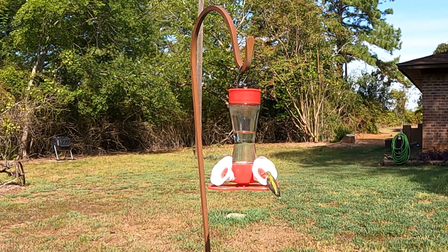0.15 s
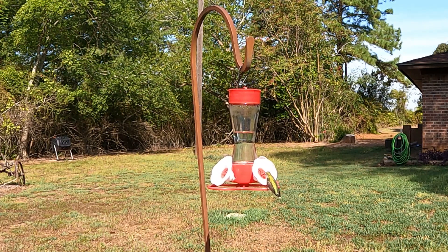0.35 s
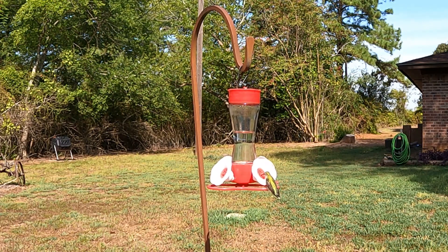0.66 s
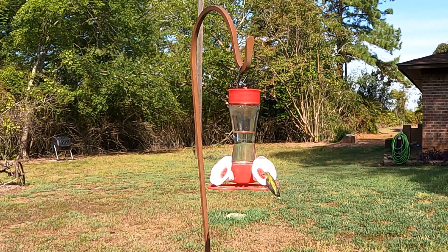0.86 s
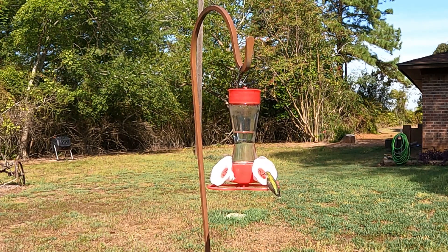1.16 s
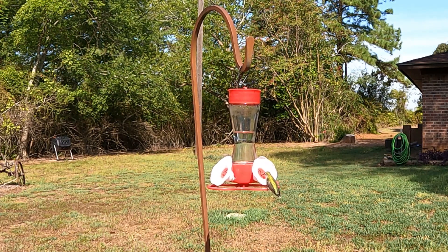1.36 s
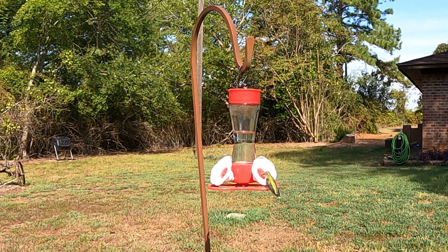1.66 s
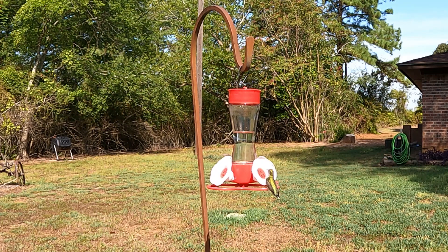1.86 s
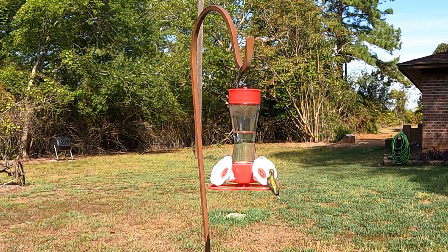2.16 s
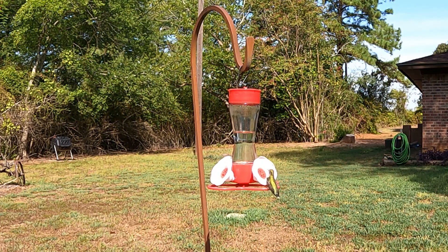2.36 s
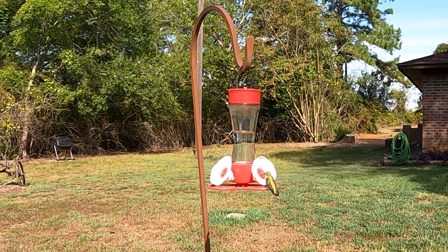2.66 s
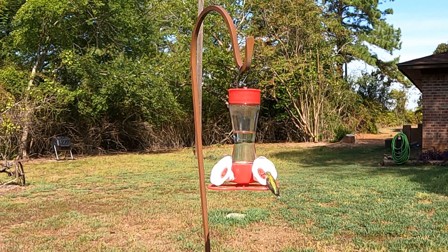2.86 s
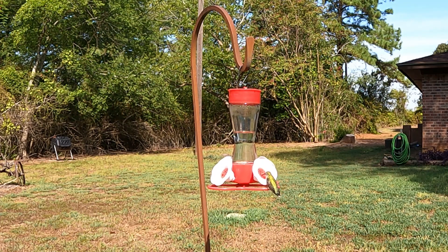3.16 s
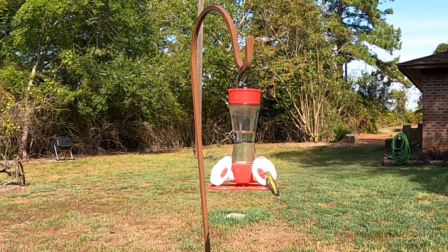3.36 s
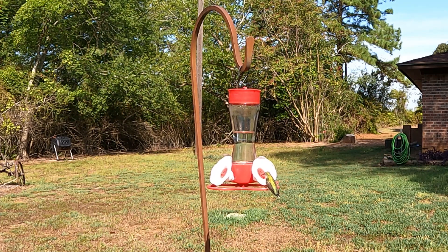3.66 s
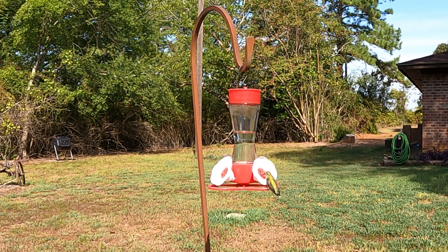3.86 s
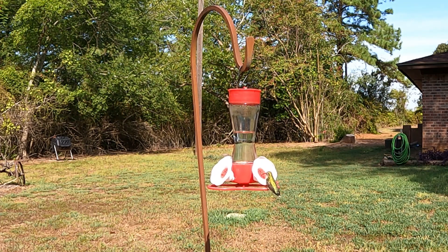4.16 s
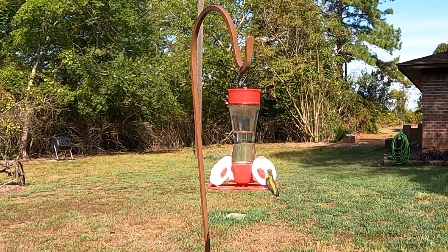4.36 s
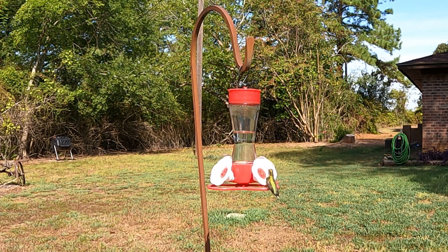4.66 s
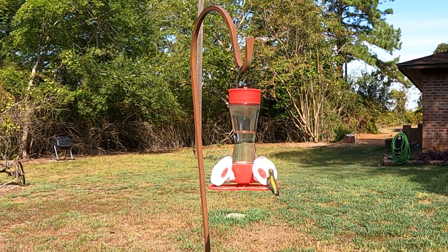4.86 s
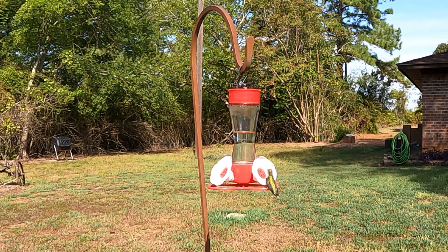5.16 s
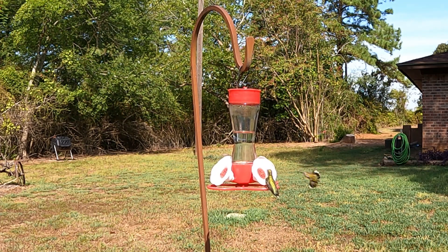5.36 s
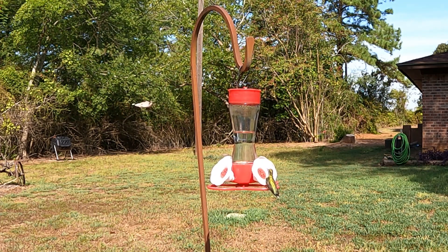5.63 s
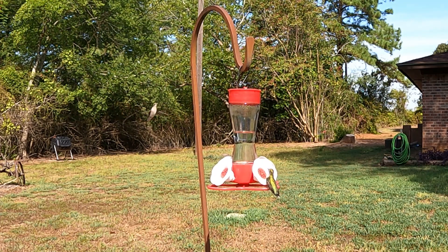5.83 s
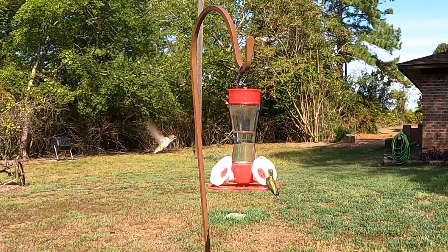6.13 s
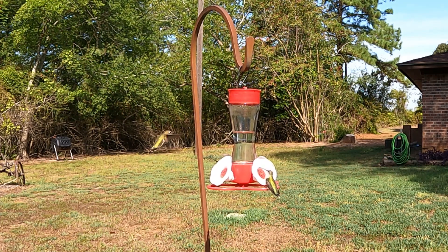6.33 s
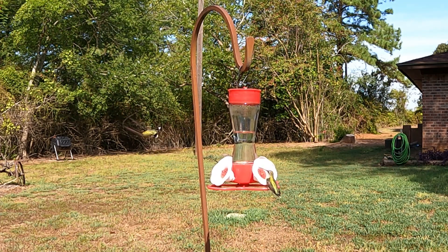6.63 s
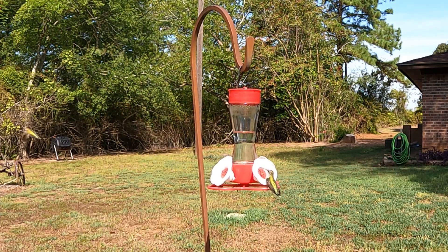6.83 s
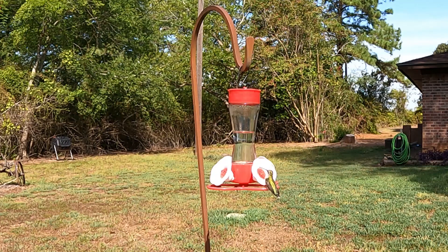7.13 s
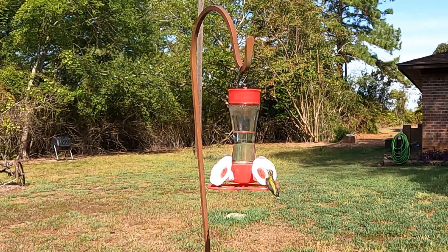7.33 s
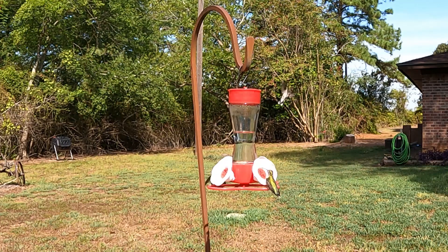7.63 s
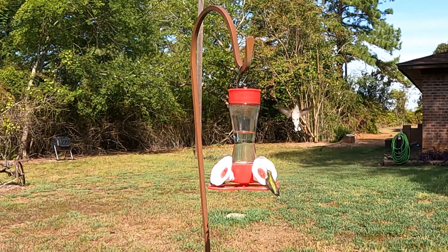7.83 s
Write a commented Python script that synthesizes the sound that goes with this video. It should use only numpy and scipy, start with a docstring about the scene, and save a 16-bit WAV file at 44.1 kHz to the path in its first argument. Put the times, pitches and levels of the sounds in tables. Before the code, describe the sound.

High songbird chirps and hummingbird chitter over low wind rumble and far traffic, followed by the darting hum of a hummingbird's wings.

```python
"""A back yard by a hummingbird feeder. Over a wash of far traffic and leaves, eddies of a breeze buffet
the microphone and a katydid buzzes by stridulation. A small songbird's syrinx gives rising chirps and
thin whistles, hummingbirds chitter in steep harmonic sweeps, and a jay and faint high voices call from
the trees. One hummingbird whirrs up to the feeder and hovers, each wingbeat a pulse of air.
The tree line scatters the calls back as diffuse echoes."""
import sys
import numpy as np
from scipy import signal
from scipy.fft import rfft, irfft, next_fast_len
from scipy.io import wavfile
from scipy.ndimage import uniform_filter1d

SR = 44100
rng = np.random.default_rng(int(sys.argv[2]) if len(sys.argv) > 2 else 0)


def persist_wave(psi):
    """Save psi, clipped to +-1, as 16-bit WAV."""
    counts = np.round(np.clip(psi, -1, 1) * 32767).astype(np.int16)
    wavfile.write(sys.argv[1], SR, np.atleast_2d(counts).T)


N = 352359
T = np.arange(N) / SR

# spectrum of the background: (frequency [Hz], gain [dB])
YARD_SPECTRUM = [(30, -8), (55, -0.5), (68, 6), (130, -10), (210, -11.5), (350, -23), (800, -26.5),
                 (1150, -21.5), (2200, -36.5), (3700, -41), (4700, -38), (6200, -40), (7700, -33),
                 (8600, -37), (15000, -68.5)]
# spectrum of eddies at the microphone: (frequency [Hz], gain [dB])
WIND_SPECTRUM = [(8, -12), (25, 0.5), (50, -2), (80, -5.5), (120, -19), (200, -28), (400, -60),
                 (1000, -68.5)]
# strength of the breeze: (time [s], level [dB])
BREEZE = [(0, -57.5), (1.05, -43), (2.0, -65.5), (2.9, -43.5), (3.8, -42), (5.1, -46.5), (6.05, -44.5),
          (6.65, -52), (7.2, -35), (7.55, -46), (7.9, -36)]
# strong eddies: (time [s], duration [s], level [dB], upper band edge [Hz])
BUFFETS = [(0.895, .058, -33.5, 50), (4.413, .063, -29.5, 77.5), (4.513, .05, -34.5, 78),
           (5.123, .05, -37, 69), (6.842, .065, -29, 61.3), (7.156, .058, -27, 80), (7.18, .045, -32, 256),
           (7.216, .14, -32.5, 97.4), (7.253, 0.0197, -40.5, 296)]
# rising chirps: (time [s], duration [s], start pitch [Hz], level [dB], upper sideband gain [dB])
CHIRPS = [(0.31, .068, 6240, -39.5, -3), (0.404, 0.067, 6330, -38.5, -6), (1.493, 0.077, 6170, -43.5, -1.5),
          (1.577, 0.061, 6080, -37, -4.5), (1.704, .071, 6190, -35.5, -6.5), (3.069, 0.069, 6460, -46, -9),
          (3.188, 0.077, 6450, -42, -13), (3.948, 0.075, 6600, -45.5, -7), (4.058, .059, 6470, -39.5, -13),
          (5.161, .06, 6330, -39.5, -16), (5.273, 0.053, 6570, -40, -22), (6.513, .065, 6100, -49, -3.5),
          (6.616, .05, 6100, -45, -6.5)]
# falling whistles: (time [s], duration [s], start pitch [Hz], end pitch [Hz], level [dB],
# trill depth [Hz], left minus right [dB])
WHISTLES = [(0.469, 0.054, 7140, 6880, -44, 10, 0), (0.655, 0.086, 6930, 6190, -56.5, 650, -1),
            (2.236, 0.077, 6910, 6530, -52, 63, -4), (2.634, 0.059, 6520, 6505, -51, 29, -3),
            (2.737, 0.075, 6400, 5880, -55, 490, -2)]
# hummingbird chips: (time [s], length [strokes], level before filtering [dB])
CHIPS = [(.818, 3.3, -61.5), (.937, 1.7, -63), (1.025, 1.85, -64), (1.124, 2, -65.5), (1.279, 1.9, -69),
         (2.905, 3.6, -59), (3.058, 1.65, -61.5), (3.164, 1.8, -63)]
# harmonics 1 to 4 of a stroke, before rasp darkens them: (gain [dB])
CHIP_HARMONICS_DB = [-3, -2, -1, -8]
# filter that colours the chips: (frequency [Hz], gain [dB])
CHIP_FILTER = [(1500, 6), (3000, -8), (3800, 0.5), (4600, -3), (6000, -2), (7800, 8), (9000, -8),
               (12000, -26)]
# jay cries: (time [s], duration [s], level [dB], gain of the fundamental [dB])
JAY_CRIES = [(1.408, .33, -64, -6.5), (3.756, .34, -60.5, -9), (7.06, .34, -58, -17.5)]
# faint calls from the trees: (time [s], duration [s], start pitch [Hz], level [dB])
FAR_CALLS = [(2.164, 0.16, 7960, -66.5), (2.847, .18, 8260, -66), (4.979, 0.24, 8150, -67),
             (5.127, 0.087, 3310, -71), (5.385, 0.083, 3280, -70), (6.199, 0.24, 7930, -68),
             (7.168, 0.23, 8150, -66.5), (7.878, .11, 8270, -70)]
# wingbeat in flight: (time [s], beat rate [Hz])
WINGBEAT = [(5.45, 52.05), (5.9, 51.75), (6.04, 46.68), (6.22, 52.8), (6.4, 42.55), (6.58, 43.84),
            (6.67, 54.76), (6.82, 44.9), (7.1, 46.2)]
# darts and sharp turns: (time [s], duration [s], effort [0-1])
DARTS = [(5.482, 0.17, 0.73), (5.672, 0.072, 0.56), (5.999, 0.2, 0.53), (6.206, 0.072, 1.0),
         (6.653, 0.096, 0.73)]
# spectrum of one wing pulse: (frequency [Hz], gain [dB])
WING_SPECTRUM = [(40, -36), (100, -2.5), (160, 1), (205, 2), (260, -4), (370, -8.5), (530, -13), (630, -28),
                 (1200, -49.5)]
# spectrum of feather hiss: (frequency [Hz], gain [dB])
SWISH_SPECTRUM = [(250, 10), (600, -3), (1300, 6), (2600, -1.5), (4000, -6), (5500, -4), (8000, -11),
                  (12000, -23)]


def undb(db):
    """Amplitude ratio of a level in decibels."""
    return 10 ** (np.asarray(db) / 20)


def unit(x):
    """Normalisation to rms 1."""
    return x / np.sqrt(np.mean(x ** 2))


def curve(points):
    """Linear interpolation of (time, value) points."""
    return np.interp(T, *np.transpose(points))


def phase_of(hz):
    """Phase is the time integral of frequency."""
    return 2 * np.pi * np.cumsum(hz) / SR


def fade(u, rise, fall):
    """Envelope with quarter-sine edges over the progress u = 0..1."""
    return np.sin(np.pi / 2 * np.clip(u / rise, 0, 1)) * np.sin(np.pi / 2 * np.clip((1 - u) / fall, 0, 1))


def ramp(onset, length):
    """Linear rise from 0 to 1."""
    return np.clip((T - onset) / length, 0, 1)


def pan(x, db):
    """A level difference, left minus right, gives direction."""
    return x * undb(np.array([[db], [-db]]) / 2)


def add(out, onset, x):
    """Superposition of a sound from its onset in seconds."""
    i = int(onset * SR)
    out[..., i:i + x.shape[-1]] += x[..., :max(N - i, 0)]


def colour(x, spectrum):
    """Minimum-phase filter: folding the cepstrum makes the response causal."""
    hz, db = np.transpose(spectrum)
    size = 2 * next_fast_len((N + SR) // 2, real=True)
    bins_hz = np.linspace(1, SR / 2, size // 2 + 1)
    gain = undb(np.interp(np.log(bins_hz), np.log(hz), db))
    cepstrum = irfft(np.log(gain))
    cepstrum[1:size // 2] *= 2
    cepstrum[size // 2 + 1:] = 0
    return irfft(rfft(x, size) * np.exp(rfft(cepstrum)))[..., :N]


def wander(rate_hz, n=N):
    """Smoothed random steps give n samples of fluctuation with rms near 1."""
    hold = int(SR / rate_hz)
    steps = np.repeat(rng.standard_normal(N // hold + 1), hold)
    return unit(uniform_filter1d(uniform_filter1d(steps, hold), hold)[:N])[:n]


def stereo_noise(side_db):
    """Partly coherent noise: a stronger side signal widens it."""
    mid, side = rng.standard_normal((2, N))
    return mid + undb(side_db) * side * np.array([[1], [-1]])


def scatter(x, t60, build_s, side_db=-7):
    """Scattering by ground, house and trees: dense echoes build up, then decay exponentially."""
    t = T[:int(1.5 * SR)]
    echoes = stereo_noise(side_db)[:, :len(t)] * np.sqrt(rng.exponential(size=len(t)))
    echoes *= np.exp(-np.log(1000) * t / t60) * (1 - np.exp(-t / build_s))
    echoes /= np.sqrt(np.sum(echoes ** 2, axis=1, keepdims=True))
    return signal.fftconvolve(x, echoes, axes=1)[:, :N]


def yard():
    """Far traffic, leaves and insects sum incoherently to noise, beside a faint machine tone."""
    wash = unit(colour(stereo_noise(-4), YARD_SPECTRUM)) * undb(-51.5 + 0.58 * wander(2.61))
    machine = np.sin(phase_of(600 + 5 * wander(12))) * undb(-75 + 0.38 * wander(8.4))
    return pan(wash + machine, -1.6)


def wind():
    """Turbulent pressure rumbles on the microphone; the strongest eddies are short, brighter buffets."""
    out = unit(colour(stereo_noise(-7), WIND_SPECTRUM)) * undb(curve(BREEZE))
    for onset, length, db, edge_hz in BUFFETS:
        u = np.linspace(0, 1, int(length * SR))
        band = signal.butter(6, [20, edge_hz], "band", fs=SR, output="sos")
        push = signal.sosfilt(band, stereo_noise(-7)[:, :SR])[:, -len(u):]
        add(out, onset, unit(push * fade(u, 0.28, 0.41)) * undb(db))
    return pan(out, -2)


def katydid():
    """Stridulation: each wing stroke draws one arched tone.
    Aliasing adds a faint mirror image at 24 kHz minus its pitch."""
    stroke_hz = np.interp(T, [0, 1.8, 4.2, 6, 8], [71.75, 71.75, 71.6, 71.5, 71.6])
    cycle = (phase_of(stroke_hz) / (2 * np.pi) + .16) % 1
    u = np.clip(cycle / 0.78, 0, 1)  # the rest of the cycle is silent
    hz = np.interp(u, [0, .2, .45, .62, .82, 1], [10330, 10660, 10820, 10750, 10300, 9650])
    phase = phase_of(hz + 45 * wander(900) + 30 * wander(60))
    alias = np.sin(2 * np.pi * 24000 * T - phase)
    tone = np.sin(phase) + undb(-11.5 + (hz - hz.max()) / 130) * alias
    flicker = undb(1.1 * wander(800) + 0.34 * wander(22))
    buzz = pan(unit(tone * fade(u, 0.24, 0.089) * flicker) * undb(-62.5), 0.4)
    return buzz + undb(-15) * scatter(buzz, t60=.3, build_s=0.0039, side_db=-4.5)


def songbird_chirps():
    """Modulation: a fast flutter of the syrinx adds sidebands to a tone that arches up, then plunges."""
    direct, to_trees = np.zeros((2, 2, N))
    for onset, length, start_hz, db, upper_db in CHIRPS:
        u = np.linspace(0, 1, int(length * SR))
        top_hz = 7210 + 0.244 * (start_hz - 6330)  # a higher start tops out a little higher
        arch = 1 - np.clip(1 - u / .76, 0, 1) ** 2
        plunge = np.clip((u - .8) / .2, 0, 1) ** 2
        hz = start_hz + (top_hz - start_hz) * arch - 1400 * plunge
        phase = phase_of(hz + 45 * wander(476, len(u)))
        flutter = phase_of(630 + 60 * wander(400, len(u)))
        upper = np.sin(phase + flutter) + undb(-19) * u * np.sin(phase + 2 * flutter)
        lower = undb(-17.5) * arch * np.sin(phase - flutter)
        tone = np.sin(phase) + undb(upper_db) * np.minimum(u / 0.17, 1) * upper + lower
        swell_db = 6.6 * (u - 1) - 22 * np.sqrt(plunge)
        quiver_db = 2 * wander(260, len(u))
        call = pan(tone * fade(u, 0.056, 0.066) * undb(swell_db + quiver_db), 3.8)
        # the bird turns its head, so the echo varies less than the direct sound
        echo_db = -45 + .5 * (db + 42)
        add(direct, onset, call * undb(db))
        add(to_trees, onset, call * undb(echo_db))
    # branches near the bird answer at once, the tree line later
    branches = undb(-10) * scatter(direct, t60=.09, build_s=.001)
    return direct + branches + scatter(to_trees, t60=0.46, build_s=0.0077)


def songbird_whistles():
    """Thin sinking tones; deep frequency modulation breaks some into a ragged trill."""
    out = np.zeros((2, N))
    for onset, length, start_hz, end_hz, db, depth_hz, pan_db in WHISTLES:
        u = np.linspace(0, 1, int(length * SR))
        trill = signal.sawtooth(2 * np.pi * 68 * u * length, .75) + .6 * wander(1500, len(u))
        glide_hz = start_hz + (end_hz - start_hz) * u ** 0.91
        hz = glide_hz + depth_hz * np.sqrt(u) * trill + 30 * wander(600, len(u))
        add(out, onset, pan(np.sin(phase_of(hz)) * fade(u, 0.091, 0.32) * undb(db), pan_db))
    branches = undb(-7) * scatter(out, t60=.09, build_s=.001)
    return out + branches + undb(-0.5) * scatter(out, t60=0.4, build_s=0.0031)


def hummingbird_chitter():
    """Each chip is a few steep downward sweeps of a harmonic series; frequency jitter makes it rasp."""
    stroke_s, spacing_s = .018, .0105
    u = np.linspace(0, 1, int(stroke_s * SR))
    out = np.zeros(N)
    for onset, strokes, db in CHIPS:
        rasp = 0.17 * strokes  # longer chips are rougher, start higher and have weaker overtones
        sweep_hz = (2996 + 1389 * rasp) * (1 - .38 * u)
        for k in range(round(strokes)):
            phase = phase_of(sweep_hz * (1 + .15 * rasp * wander(2500, len(u))))
            stroke = sum(undb(harmonic_db - 3 * rasp * i) * np.sin((i + 1) * phase)
                         for i, harmonic_db in enumerate(CHIP_HARMONICS_DB))
            add(out, onset + k * spacing_s, unit(stroke * fade(u, .25, .45)) * undb(db))
    out = pan(colour(out, CHIP_FILTER), 0)
    # the bird is some way off, so the chips come mostly by way of the leaves
    leaves = scatter(out, t60=.1, build_s=.002)
    return undb(-3) * out + leaves + undb(-4) * scatter(out, t60=.38, build_s=.005)


def jay():
    """A far, falling cry led by its second harmonic; a growing inharmonic partial turns it hoarse."""
    scoop_hz, scoop_s = 70, .03  # each cry slides up into its note
    out = np.zeros((2, N))
    for onset, length, db, fundamental_db in JAY_CRIES:
        u = np.linspace(0, 1, int(length * SR))
        hz = 1577 - 134 * u ** 2.3 - scoop_hz * np.exp(-u * length / scoop_s)
        phase = phase_of(hz + (13 + 35 * u ** 2) * wander(300, len(u)))
        jitter = phase_of(140 * u * wander(700, len(u)))
        hoarse = (undb(-26.5) + undb(-12) * u ** 2) * np.sin(2.44 * phase + jitter)
        swell = np.minimum(0.17 + u / 0.32, 1) * undb(-2 * u ** 2)
        cry = swell * np.sin(2 * phase) + undb(fundamental_db) * np.sin(phase) + hoarse
        envelope = fade(u, 0.041, 0.022) * undb(db + 2 * wander(69.4, len(u)))
        add(out, onset, pan(cry * envelope, 5))
    return undb(-2.5) * out + undb(4) * scatter(out, t60=1.1, build_s=0.011, side_db=2)


def far_calls():
    """Wavering, sagging notes from deep in the trees arrive only as a diffuse field."""
    out = np.zeros(N)
    for onset, length, hz, db in FAR_CALLS:
        u = np.linspace(0, 1, int(length * SR))
        phase = phase_of(hz * (1 - 0.032 * u) + 130 * wander(500, len(u)))
        add(out, onset, np.sin(phase) * fade(u, 0.1, 0.32) * undb(db))
    return scatter(pan(out, 0), t60=0.54, build_s=0.0044)


def dart_effort(attack_s=0.039, release_s=.055):
    """Wing effort jumps at each dart, holds, then relaxes exponentially."""
    return np.max([peak * ramp(onset, attack_s) * np.exp(-np.maximum(T - onset - length, 0) / release_s)
                   for onset, length, peak in DARTS], axis=0)


def hummingbird_wings():
    """Periodic air pulses hum at harmonics of the wingbeat: soft in a glide, snappy in dart or hover."""
    flight_s, flight_end_s, fade_s, recede_db_per_s = 5.45, 7.1, 0.053, 1.5
    hover_s, approach_s, hover_hz = 7.41, .3, 52.3
    effort = dart_effort()
    flying = ramp(flight_s, fade_s) - ramp(flight_end_s - fade_s, fade_s)
    flight_gain = flying * undb(-51.5 - recede_db_per_s * np.maximum(T - flight_s, 0) + 8 * effort)
    near = ramp(hover_s, approach_s)  # the bird closes in on the feeder
    hover = ramp(hover_s, fade_s) * undb(-9.5 * (1 - near))
    beat_hz = curve([*WINGBEAT, (hover_s + approach_s, hover_hz)])
    phase = phase_of(beat_hz * (1 + .016 * wander(45)))
    cycles = phase / (2 * np.pi)
    downstrokes = np.diff(np.floor(cycles), prepend=0)
    upstrokes = np.diff(np.floor(cycles + .5 + 0.029 * wander(25)), prepend=0)
    # in sharp turns the upstroke pushes too
    beats = (downstrokes + .75 * effort * upstrokes) * undb(1.8 * wander(50))
    vortices = rng.standard_normal(N) * (1 + np.cos(phase))  # shed vortices roughen every beat
    pulses = unit(colour(beats, WING_SPECTRUM)) + undb(-10) * unit(colour(vortices, WING_SPECTRUM))
    soft = signal.sosfiltfilt(signal.butter(3, 285, fs=SR, output="sos"), pulses)
    snap = (pulses - soft) * undb(-13.5 + 12.5 * (effort + np.sqrt(near)))
    hum = pan((soft + snap) * (flight_gain + hover * undb(-43)), 0)
    # the feathers hiss twice a beat, loudest in the darts
    strokes = undb(1.76 * np.cos(phase) + 3.7 * np.cos(2 * phase))
    swish_gain = flying * undb(-71.5) + effort * undb(-55.5) + hover * undb(-65)
    swish = unit(colour(stereo_noise(-6.5), SWISH_SPECTRUM) * strokes) * swish_gain
    return pan(hum + undb(-7.5) * scatter(hum, t60=0.089, build_s=0.0037) + swish, -0.67)


def scene():
    """Superposition: the pressures of birds, insect, breeze and yard add."""
    calls = songbird_chirps() + songbird_whistles() + hummingbird_chitter() + jay() + far_calls()
    return calls + katydid() + hummingbird_wings() + wind() + yard()


def record(dry):
    """Band limiting: the recorder's steep low-pass cuts the top octave short."""
    top_hz = 14500
    return signal.sosfilt(signal.ellip(8, .2, 70, top_hz, fs=SR, output="sos"), dry)


dry = scene()
out = record(dry)
persist_wave(out)
```